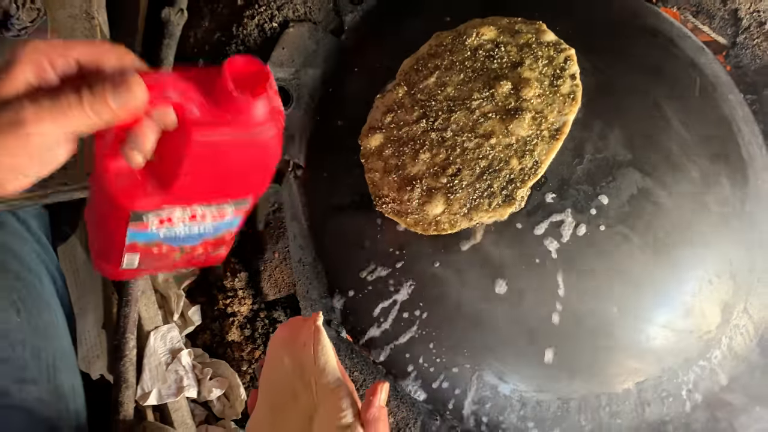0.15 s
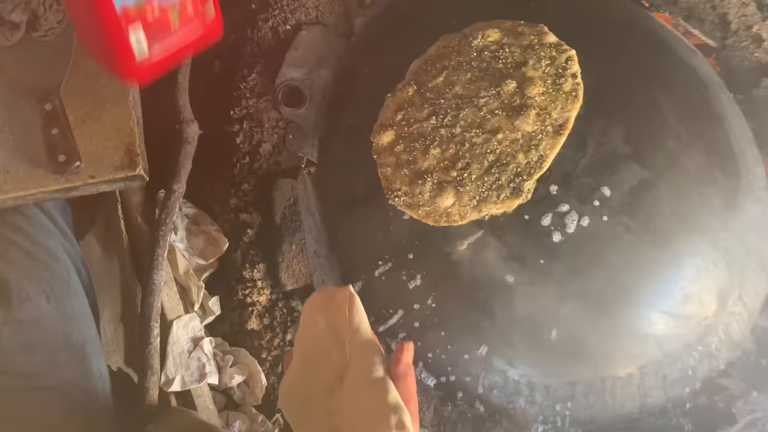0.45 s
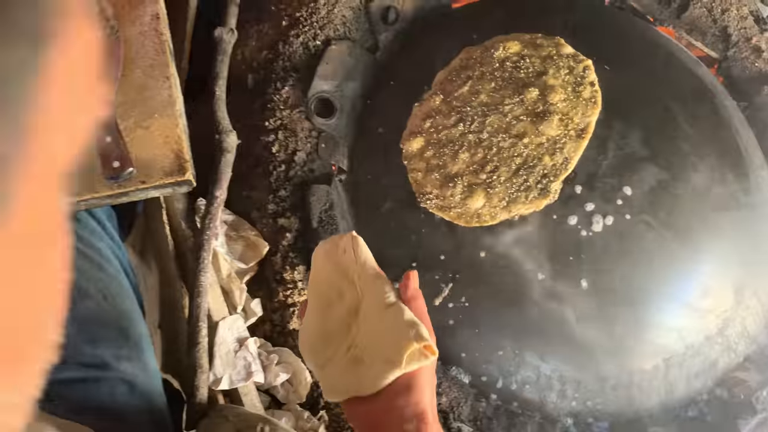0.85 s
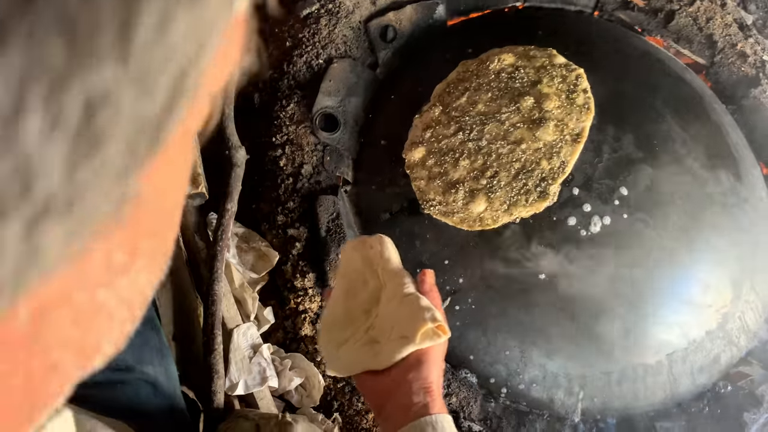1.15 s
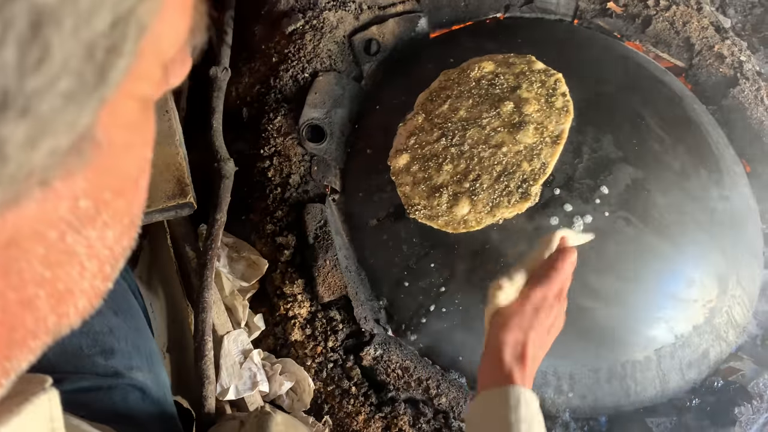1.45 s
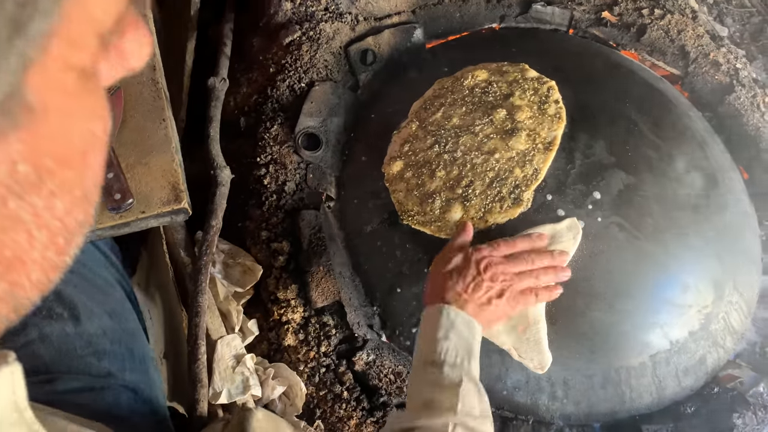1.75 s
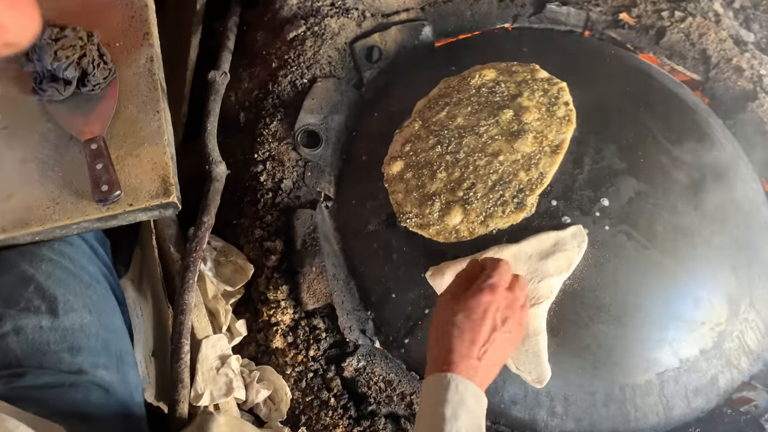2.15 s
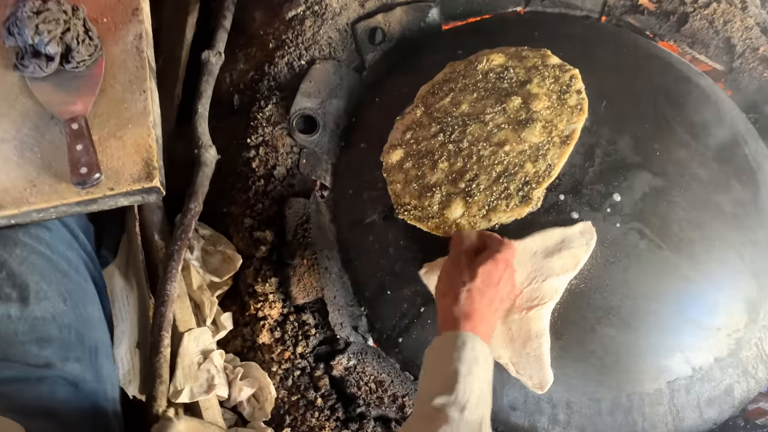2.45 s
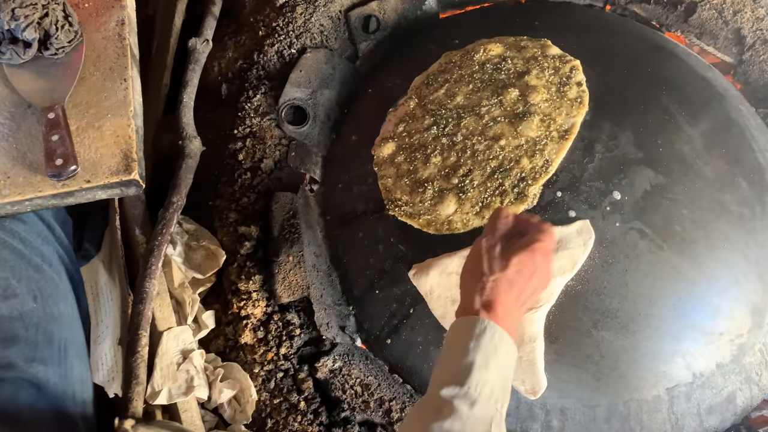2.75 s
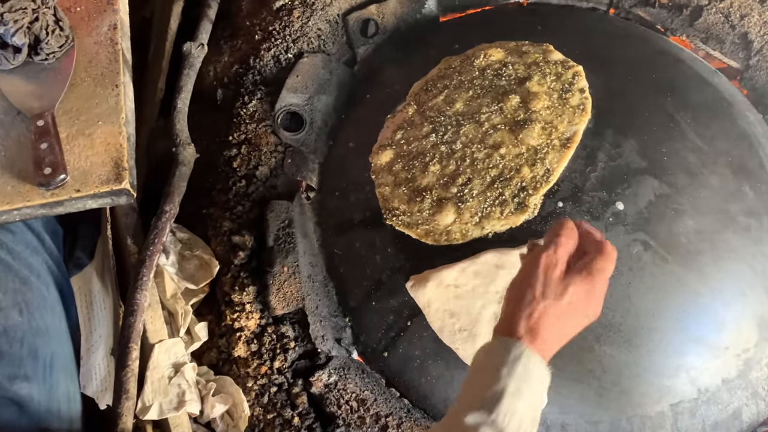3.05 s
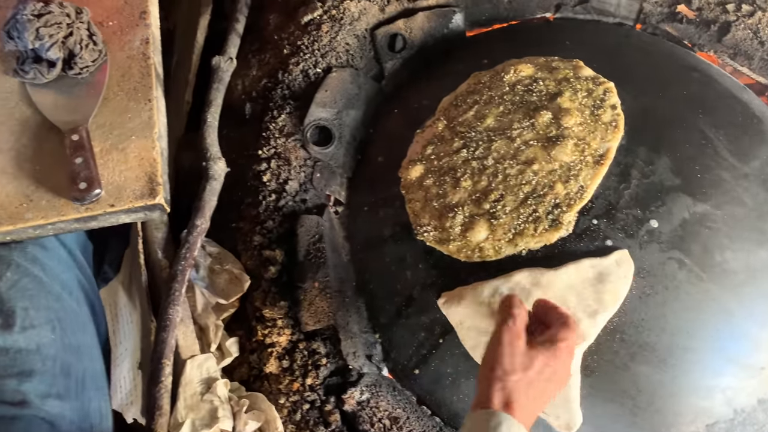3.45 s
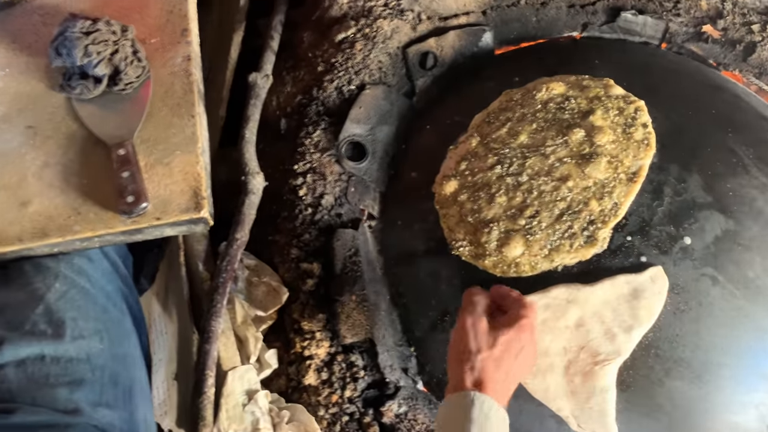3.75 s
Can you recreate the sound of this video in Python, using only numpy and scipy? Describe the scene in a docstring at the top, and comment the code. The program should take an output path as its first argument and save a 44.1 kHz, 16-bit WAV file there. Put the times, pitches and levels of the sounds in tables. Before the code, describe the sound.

Water sizzles on a very hot iron griddle, heard close: bright, dense hiss strongest in the first half second, with crisp pops and lower spits, then steadily fading to almost nothing by 4 s. Faint dull bumps come early, a plastic jug is set down softly at 1.0 s, dough slaps at 1.7 s, light fingertip presses follow from 2 s, and a dull thump lands near 3.75 s over a very faint low fire.

```python
"""Close by a very hot iron griddle over a wood fire, one microphone: water sizzles away from the start as
steam noise and tiny bursts, with popping clicks, lower spits and a few dull bumps; the fire is filtered noise.
After a second a plastic jug is set down on a board, then dough is slapped on the iron (both damped sines).
From two seconds on fingertips press the dough with short rings, low pushes and puffs of noise.
Near the end comes a dull thump of low damped sines, while the sizzle has nearly died away."""
import sys
import numpy as np
from scipy import signal
from scipy.fft import rfft, irfft
from scipy.io import wavfile
from scipy.ndimage import uniform_filter1d, map_coordinates

SR = 44100
rng = np.random.default_rng(int(sys.argv[2]) if len(sys.argv) > 2 else 0)


def how_loud(loudness_db):
    """Turn decibels into a plain amplitude multiplier (0 dB gives 1, 20 dB gives 10)."""
    steps = np.asarray(loudness_db, float) / 20
    return 10 ** steps


def inscribe(sig):
    """Save sig as 16-bit PCM at rate SR to the path in sys.argv[1].

    A 1-D sig is mono; a 2-D sig holds one channel per row.
    Samples are clipped to [-1, 1] before scaling.
    """
    pcm = np.round(np.clip(np.atleast_2d(sig).T, -1, 1) * 32767)
    wavfile.write(sys.argv[1], SR, pcm.astype(np.int16))


N = 171990  # samples, 3.9 s


def unit_rms(x):
    """Scales a sound to rms 1."""
    return x / np.sqrt(np.mean(x ** 2) + 1e-20)


def level_curves(rows):
    """Draws straight lines between table rows: one curve for each column after the time."""
    times, *columns = np.transpose(rows)
    return [np.interp(np.arange(N) / SR, times, column) for column in columns]


def wobble(rate):
    """A smooth random curve through rate knots a second."""
    knots = rng.standard_normal(int(N * rate / SR) + 4)
    return map_coordinates(knots, [np.arange(N) * rate / SR])


def filter_response(spectrum, size=8192):
    """Minimum-phase impulse response with the gains of (frequency [Hz], level [dB]) points."""
    hz, db = np.transpose(spectrum)
    bins = np.fft.rfftfreq(size, 1 / SR)
    gain_db = np.interp(np.log(bins + 1), np.log(hz + 1), db)
    cepstrum = irfft(np.log(how_loud(gain_db) + 1e-6))
    # folding the cepstrum onto positive times makes the response causal
    cepstrum[1:size // 2] *= 2
    cepstrum[size // 2 + 1:] = 0
    return irfft(np.exp(rfft(cepstrum)))


def coloured(x, spectrum):
    """Filters x through a spectrum and scales it to rms 1."""
    return unit_rms(signal.fftconvolve(x, filter_response(spectrum))[:N])


def patchy_noise(spread_db):
    """White noise whose gain varies randomly in patches of time and frequency."""
    cells = signal.stft(rng.standard_normal(N + 512), nperseg=512)[2]
    field = rng.standard_normal(cells.shape)
    field = uniform_filter1d(field, size=8, axis=0)  # smooth over frequency bins
    field = uniform_filter1d(field, size=10, axis=1)  # smooth over frames
    noise = signal.istft(cells * how_loud(spread_db * unit_rms(field)), nperseg=512)[1]
    return unit_rms(noise[:N])


def add(out, s, db, shape):
    """Adds a shape starting at s seconds, its peak scaled to db."""
    part = out[round(s * SR):][:len(shape)]
    part += how_loud(db) * shape[:len(part)] / np.abs(shape).max()


def ring(modes, attack):
    """A struck body: damped sines that swell over attack seconds, levels varied a little each time."""
    t = np.arange(SR // 4) / SR
    total = np.zeros(len(t))
    for hz, db, t60 in modes:
        decay = how_loud(db + rng.normal(0, 1.25) - 60 * t / t60)
        total += decay * np.sin(2 * np.pi * hz * t)
    return (1 - np.exp(-t / attack)) * total


# boiling water, levels before the wobble: (time [s], high fizz level [dB], lower hiss level [dB])
BOIL_LEVELS = [(0, -41.5, -45), (.15, -40, -45), (.28, -37.5, -45), (.31, -39.5, -44.5), (.38, -39, -44.5),
               (.42, -35.5, -44), (.47, -40, -44.5), (.535, -45, -46.5), (.555, -42.5, -46),
               (.575, -47.5, -47), (.65, -46.5, -48), (.72, -46, -48.5), (.82, -41, -49),
               (.905, -44, -47.5), (.92, -47.5, -50.5), (1.06, -46, -51.5), (1.2, -47, -52.5),
               (1.33, -46.5, -53), (1.37, -49.5, -53), (1.42, -46, -54), (1.48, -50, -53.5),
               (1.62, -51, -57.5), (1.75, -51, -55), (1.8, -53, -58), (2.15, -53, -57.5),
               (2.45, -54.5, -61), (2.55, -59, -61.5), (2.78, -58.5, -64.5), (2.88, -63, -67.5),
               (3.02, -58.5, -67), (3.2, -59.5, -87), (3.45, -61, -69), (3.6, -63.5, -72.5),
               (3.9, -64.5, -73.5)]
# colour of the high fizz: (frequency [Hz], relative level per Hz [dB])
FIZZ_SPECTRUM = [(2650, -34), (4500, -6.5), (6680, -4), (7450, -1.5), (9030, 2.5), (11000, -7),
                 (12900, -1.5), (14100, -2), (15100, -3.5), (15600, -14)]
# colour of the lower hiss: (frequency [Hz], relative level per Hz [dB])
HISS_SPECTRUM = [(240, -30), (400, -16), (605, -14.5), (758, -15.5), (1040, -10.5), (1250, -9.5),
                 (3010, -4.5), (6630, -5.5), (8000, -7.5), (10400, -16.5), (17600, -120)]


def sizzle():
    """Boiling water: steam noise mixed with countless tiny bursts; the same bursts feed fizz and hiss."""
    bursts_per_s, spread_db, cap_spreads = 6000, 2.5, 3.5
    fizz_share, hiss_share = 0.28, 0.47  # share of the bursts in the power
    fizz_db, hiss_db = level_curves(BOIL_LEVELS)
    hit = rng.random(N) < bursts_per_s / SR
    size_db = spread_db * np.minimum(rng.exponential(size=N), cap_spreads)
    bursts = unit_rms(hit * rng.standard_normal(N) * how_loud(size_db))

    def steam(burst_share, patch_db):
        """Bursts and patchy noise mixed by power."""
        return np.sqrt(burst_share) * bursts + np.sqrt(1 - burst_share) * patchy_noise(patch_db)

    shared_db = 0.58 * wobble(6.6) + 0.37 * wobble(29.99)
    fizz_gain = how_loud(fizz_db + shared_db + 0.28 * wobble(13))
    hiss_gain = how_loud(hiss_db + shared_db + 0.2 * wobble(12))
    fizz = fizz_gain * coloured(steam(fizz_share, 1.0), FIZZ_SPECTRUM)
    hiss = hiss_gain * coloured(steam(hiss_share, 1.94), HISS_SPECTRUM)
    return fizz + hiss


# single drops that burst loudly: (time [s], peak level [dB])
POP_EVENTS = [(.553, -28), (.5573, -25), (.6306, -28), (.9033, -25), (1.4253, -30), (1.6456, -33),
              (1.7106, -34), (1.7585, -31), (1.8892, -34), (2.0777, -35), (2.1688, -38), (2.2351, -37),
              (2.5817, -41), (2.8001, -37), (3.2102, -38), (3.3259, -37), (3.3296, -39), (3.3407, -43),
              (3.5443, -47), (3.6442, -40), (3.6922, -45), (3.7048, -41), (3.8705, -48)]
# colour of a pop: (frequency [Hz], relative level per Hz [dB])
POP_SPECTRUM = [(800, -40), (1500, -20), (4500, -7), (8800, 0), (11000, -8), (13000, -5), (15500, -9),
                (16500, -40)]


def pops():
    """Single drops burst: a sharp click with a short spit of steam, a decaying noise."""
    tail_db, tail_t60 = -13, .004  # under the click before filtering; s
    out, t = np.zeros(N), np.arange(800) / SR
    for s, db in POP_EVENTS:
        burst = how_loud(tail_db - 60 * t / tail_t60) * rng.standard_normal(len(t))
        burst[0] = 1  # the click
        add(out, s, db, signal.fftconvolve(burst, filter_response(POP_SPECTRUM))[:len(t)])
    return out


# bigger drops spit lower: (time [s], peak level [dB])
SPIT_EVENTS = [(0.3242, -30), (0.3994, -35), (0.5955, -35), (0.6424, -32.5), (0.7694, -37), (0.8594, -38),
               (1.951, -40), (2.0108, -44.5)]
# colour of a spit: (frequency [Hz], relative level per Hz [dB])
SPIT_SPECTRUM = [(400, -29), (900, -7), (2000, -5), (5000, 4.5), (8000, -11.5), (14000, -37)]


def spits():
    """Bigger drops spit: a short decaying burst of mid-band steam noise."""
    spit_t60 = 0.017  # s
    out, t = np.zeros(N), np.arange(1200) / SR
    for s, db in SPIT_EVENTS:
        burst = how_loud(-60 * t / spit_t60) * rng.standard_normal(len(t))
        add(out, s, db, signal.fftconvolve(burst, filter_response(SPIT_SPECTRUM))[:len(t)])
    return out


# the jug lands and rocks on the board: (time [s], peak level [dB])
JUG_HITS = [(1.043, -44), (1.075, -55), (1.107, -53), (1.259, -55)]
# ringing of the plastic jug: (frequency [Hz], relative level [dB], t60 [s])
JUG_MODES = [(259.4, -1.5, 0.15), (293, -1, 0.063), (421, -7.5, 0.092), (480, -12, .08), (600, -12, .06)]


def jug():
    """A plastic jug is set down: each contact excites the same few low modes."""
    out = np.zeros(N)
    for s, db in JUG_HITS:
        add(out, s, db, ring(JUG_MODES, attack=.002))
    return out


# dough meets the iron in a few contacts: (time [s], peak level [dB])
SLAP_CONTACTS = [(1.6672, -45), (1.6725, -43), (1.6757, -33), (1.6803, -45), (1.6828, -41), (1.6905, -51)]
# ringing of the iron under the dough: (frequency [Hz], relative level [dB], t60 [s])
IRON_MODES = [(110, -12, .06), (460, -15, .025), (727, -11, .04), (900, -4, .012), (1080, 0, .014),
              (1350, -4, .01), (1750, -2, .012), (2050, -7, .02), (3200, -7, .006)]


def dough_slap():
    """Dough slapped on the griddle: a quick run of contacts, each a short ring of the iron."""
    out = np.zeros(N)
    for s, db in SLAP_CONTACTS:
        add(out, s, db, ring(IRON_MODES, attack=0.00029))
    return out


# fingertips press the dough:
# (time [s], peak level [dB], centre [Hz], relative level of low push [dB], relative level of plate ring [dB])
FINGER_TAPS = [(2.011, -57, 970, -15, -12), (2.091, -56, 500, -8, -7), (2.359, -60, 260, 2, -23),
               (2.5, -51, 600, 1, 0), (2.569, -57, 800, -11, -3), (2.662, -57.5, 350, -6, -10),
               (2.768, -55.5, 900, -13, -9), (2.903, -58, 440, -4, -18), (2.988, -56, 800, -15, -14),
               (3.015, -65, 600, -15, -10), (3.148, -52.5, 560, -7, -12), (3.178, -54.5, 1000, -15, -6),
               (3.227, -48.5, 855, -24, -15), (3.412, -52.5, 500, -3, -18), (3.484, -52.5, 1000, -18, -11),
               (3.652, -52.5, 600, -8, -5), (3.776, -57, 1100, -10, -15), (3.834, -56, 650, -8, -12),
               (3.872, -47.5, 990, -15, -17), (3.876, -54, 370, -10, -20)]


def fingertips():
    """Soft contacts: a short wide ring, a low push as the dough gives, a soft iron ring and a dull puff."""
    push_hz, push_t60, plate_hz, plate_t60 = 230, .03, 470, .045  # Hz, s
    puff_db, puff_t60 = -5, .035  # rms at its start against the ring's peak; s
    out, t = np.zeros(N), np.arange(SR // 16) / SR
    for s, db, hz, push_db, plate_db in FINGER_TAPS:
        modes = [(hz * k, -3 * k, 6 / (hz * k)) for k in (.7, 1, 1.6)]  # each falls 60 dB in 6 cycles
        modes += [(push_hz, push_db, push_t60), (plate_hz, plate_db, plate_t60)]
        tap = ring(modes, attack=0.00082)[:len(t)]
        band = signal.butter(2, [.5 * hz, 2 * hz], "band", fs=SR)
        noise = signal.lfilter(*band, rng.standard_normal(len(t)))
        puff = how_loud(puff_db - 60 * t / puff_t60) * unit_rms(noise)
        add(out, s, db, tap / np.abs(tap).max() + puff)
    return out


# dull low bumps, the last three forming the thump: (time [s], peak level [dB], frequency [Hz], t60 [s])
BUMP_EVENTS = [(.141, -42.5, 125, 0.031), (0.211, -47.5, 143, 0.026), (0.293, -51, 104, 0.019),
               (3.419, -55, 140, .035), (3.65, -50, 156, 0.032), (3.7465, -34, 124, 0.033),
               (3.756, -37.5, 85, 0.061), (3.773, -41.5, 91, 0.068)]


def bumps():
    """Each bump is one push of air that swings out quickly, with a sharper edge at three times the pitch."""
    edge_db, edge_t60 = -8.5, 0.02  # relative to the push; s
    out = np.zeros(N)
    for s, db, hz, t60 in BUMP_EVENTS:
        push = -ring([(hz, 0, t60)], attack=0.0016)
        edge = ring([(3 * hz, edge_db, edge_t60)], attack=0.0031)
        edge = np.roll(edge, round(.1 * SR / hz))  # a tenth of a low cycle later
        add(out, s, db, push + edge)
    return out


# fire under the griddle, flutter before its wobble: (time [s], deep draught level [dB], flame flutter level [dB])
FIRE_LEVELS = [(0, -60, -65), (.12, -62, -65), (.25, -55, -66), (.55, -58, -66), (.62, -56, -65),
               (.8, -60, -66), (1.1, -59, -68), (1.4, -62, -70), (1.8, -65, -69), (2.2, -65, -70),
               (2.7, -64, -69), (3.2, -66, -69), (3.55, -61, -67), (3.9, -61, -65)]
# colour of the deep draught: (frequency [Hz], relative level per Hz [dB])
DRAUGHT_SPECTRUM = [(4, -4), (12, 0), (20, -1), (28, -5), (36, -11), (45, -19), (55, -26), (100, -120)]
# colour of the flame flutter: (frequency [Hz], relative level per Hz [dB])
FLAME_SPECTRUM = [(26, -30), (45, -6), (65, -5), (100, 0), (145, -4), (200, -11), (250, -20), (320, -28),
                  (420, -30), (600, -60), (880, -120)]
# colour of the faint air noise: (frequency [Hz], relative level per Hz [dB])
AIR_SPECTRUM = [(120, -36), (200, -7), (240, -5), (359, -16.5), (834, -9), (898, -12), (1670, -9),
                (9520, -14.5), (15900, -22.5)]


def fire():
    """Wood fire: noise as deep draught and low wavering flames, over a steady faint air noise."""
    air_db = -64.5  # rms
    draught_db, flutter_db = level_curves(FIRE_LEVELS)
    draught = how_loud(draught_db) * coloured(rng.standard_normal(N), DRAUGHT_SPECTRUM)
    flame_gain = how_loud(flutter_db + 1.8 * wobble(5) + 1.5 * wobble(14))
    flames = flame_gain * coloured(rng.standard_normal(N), FLAME_SPECTRUM)
    air = how_loud(air_db) * coloured(patchy_noise(1), AIR_SPECTRUM)
    return draught + flames + air


def scene():
    """All sources reach one close microphone, placed equally on two channels."""
    water = sizzle() + pops() + spits()
    handling = jug() + dough_slap() + fingertips() + bumps()
    mono = water + handling + fire()
    return np.array([mono, mono])


def low_pass(x):
    """Removes everything above the highest recorded frequency."""
    return signal.sosfilt(signal.butter(12, 16050, fs=SR, output="sos"), x)


def record(dry):
    """Takes the two equal channels at their own level to the finished sound."""
    return low_pass(dry)


dry = scene()
out = record(dry)
inscribe(out)
```